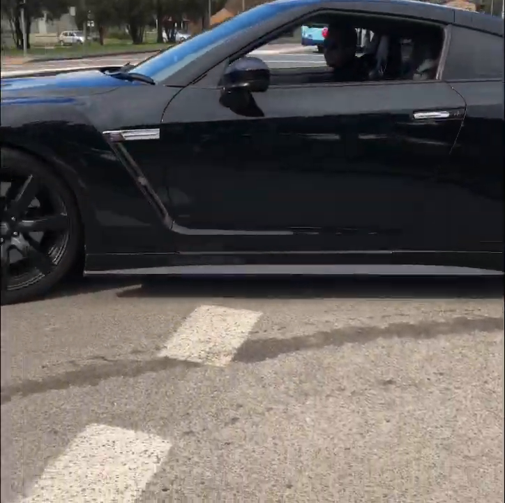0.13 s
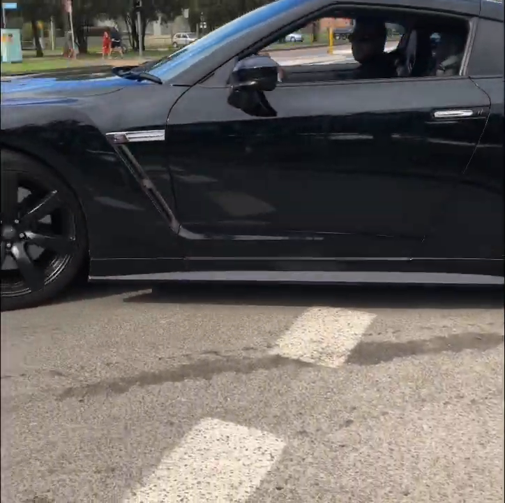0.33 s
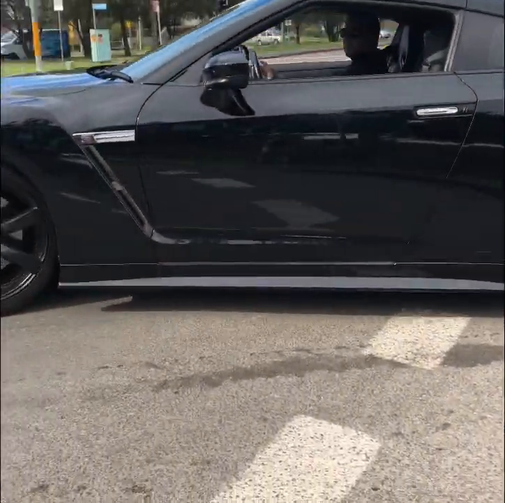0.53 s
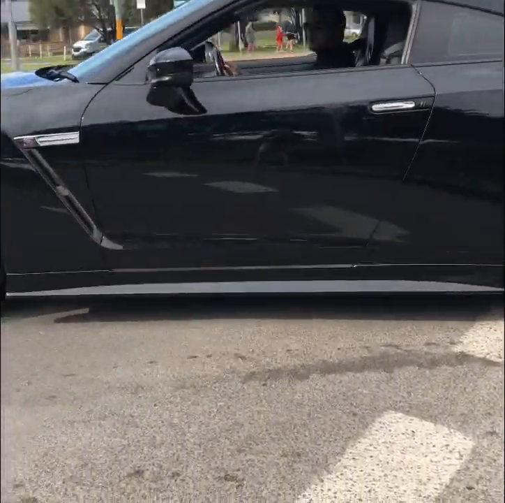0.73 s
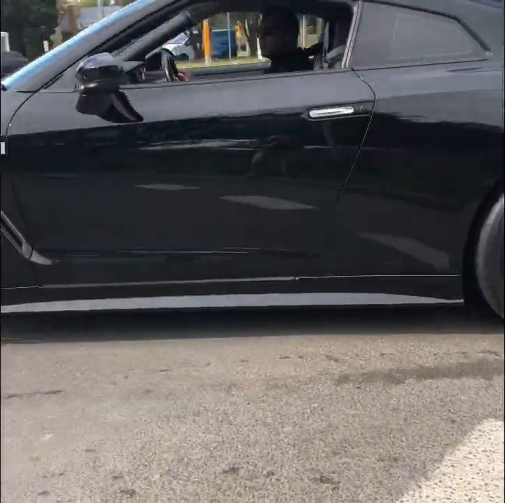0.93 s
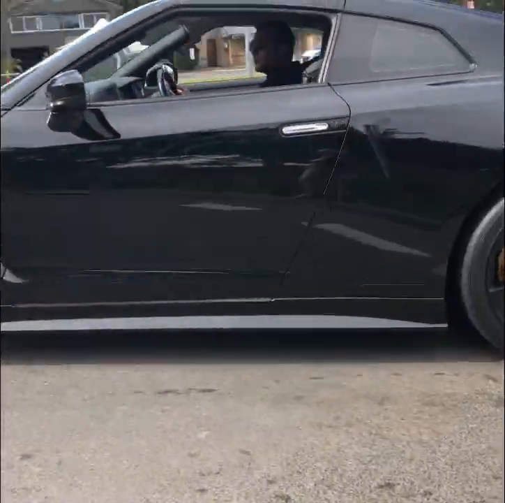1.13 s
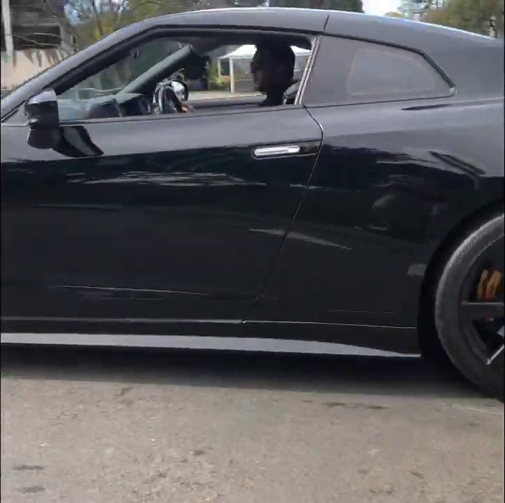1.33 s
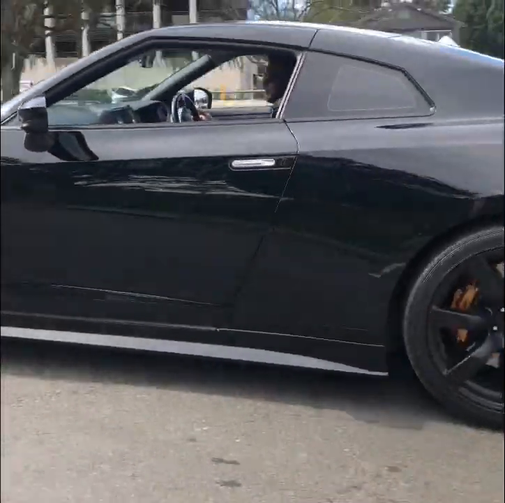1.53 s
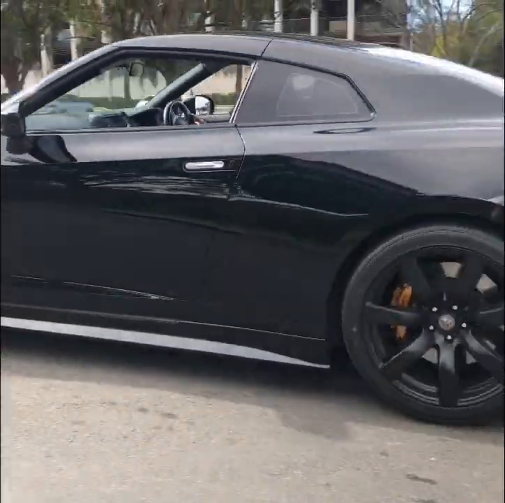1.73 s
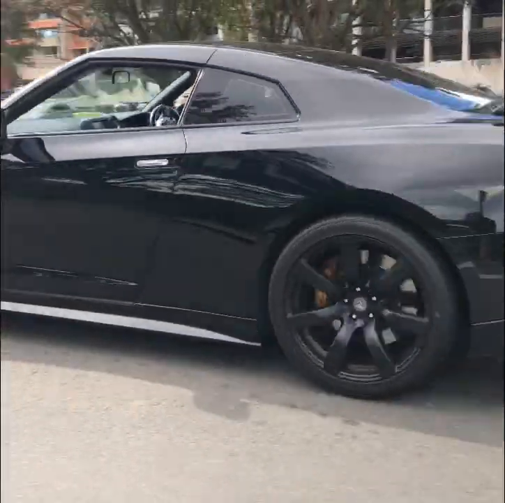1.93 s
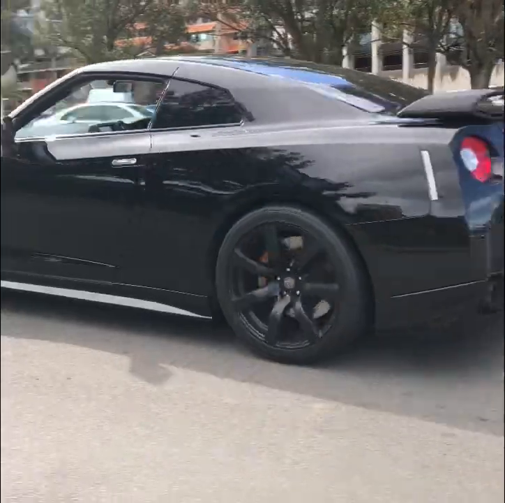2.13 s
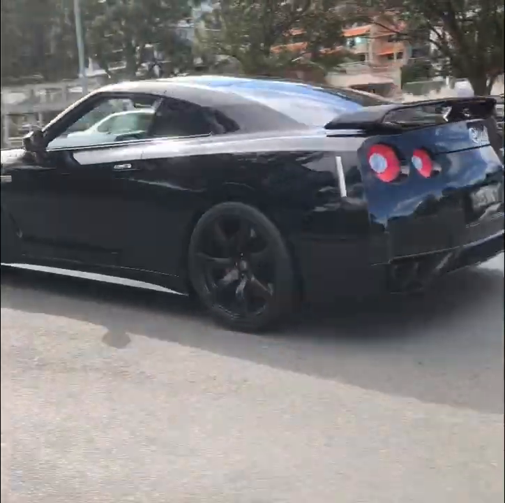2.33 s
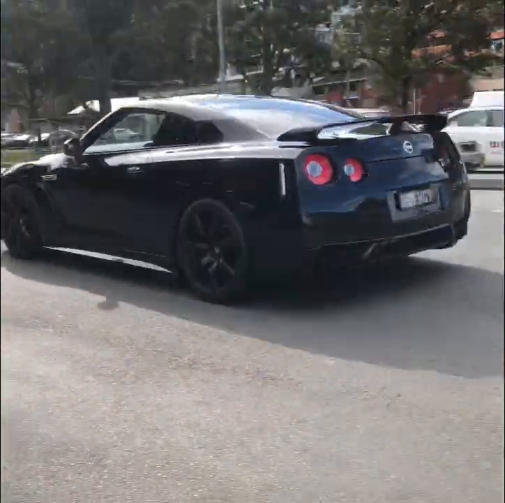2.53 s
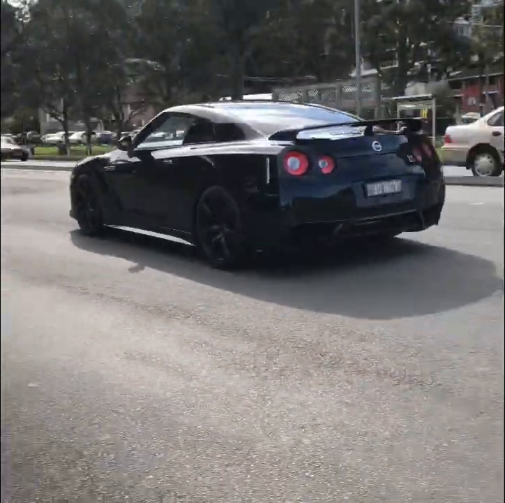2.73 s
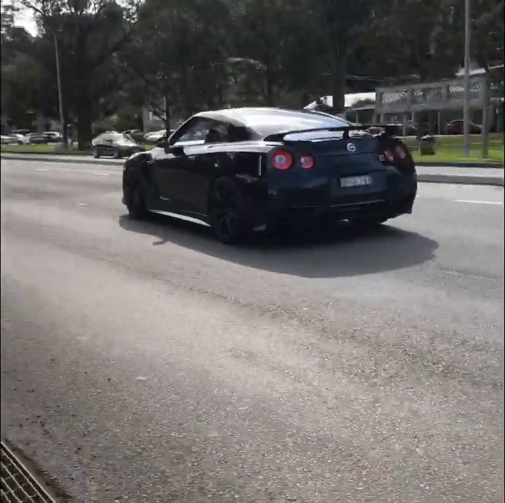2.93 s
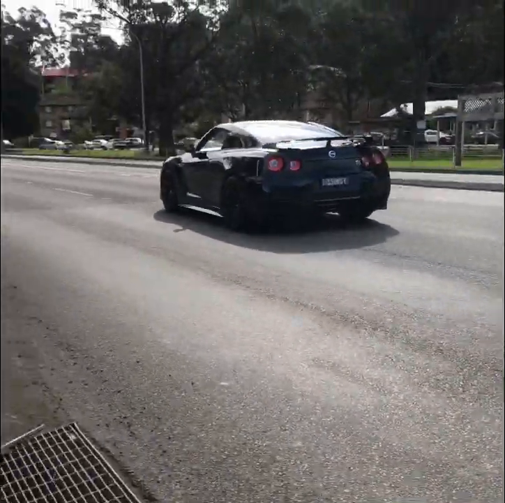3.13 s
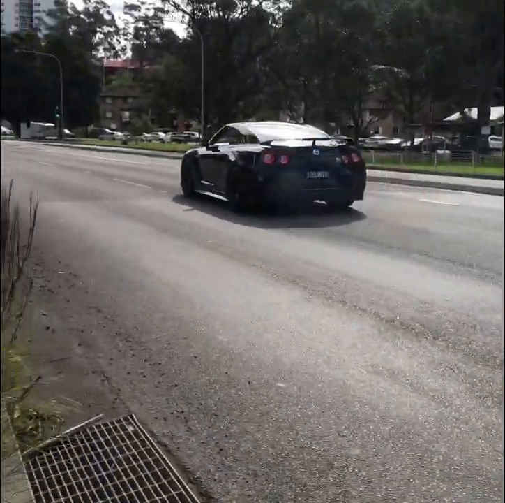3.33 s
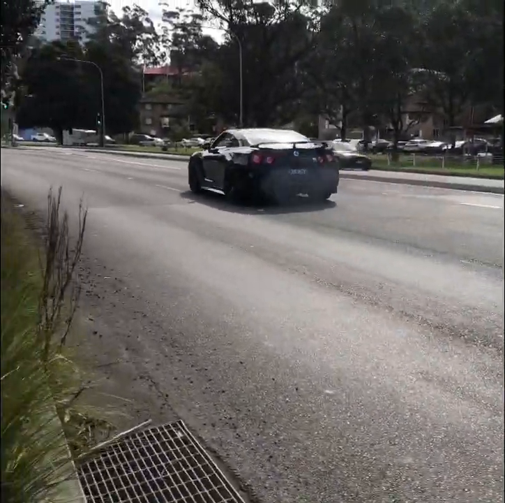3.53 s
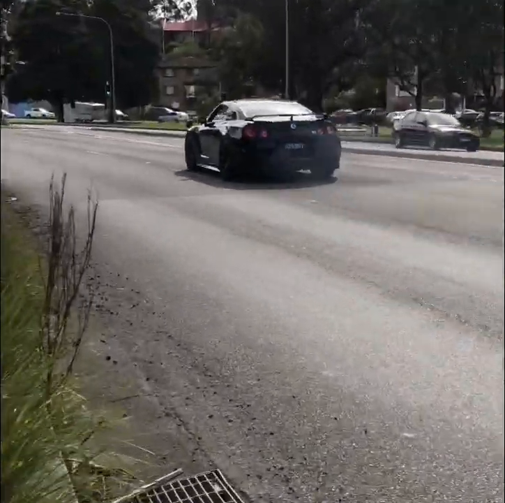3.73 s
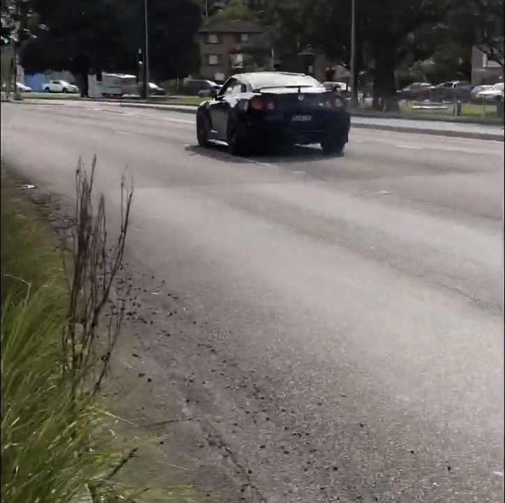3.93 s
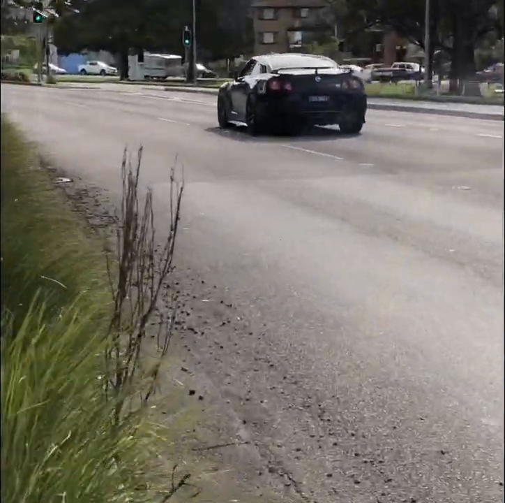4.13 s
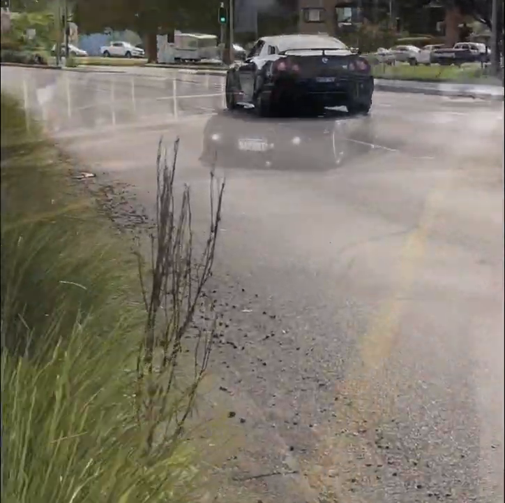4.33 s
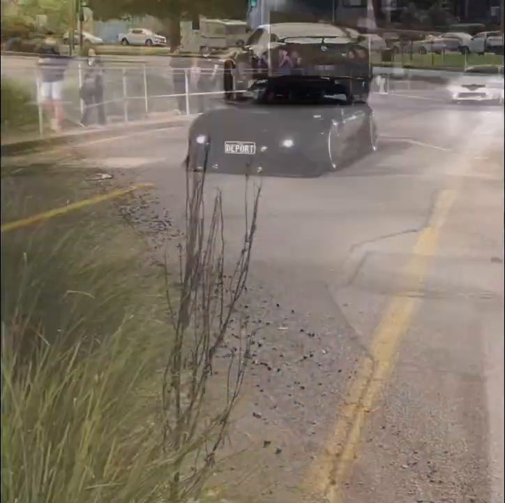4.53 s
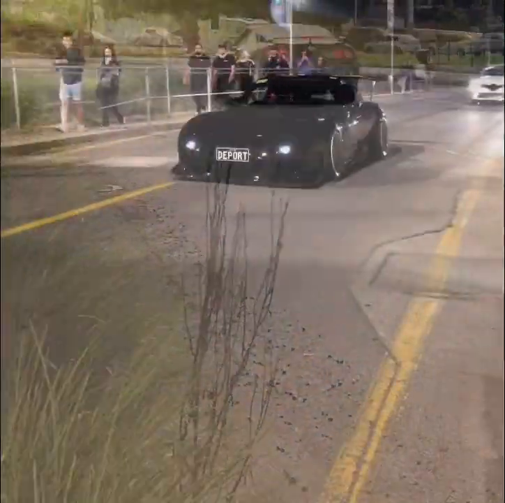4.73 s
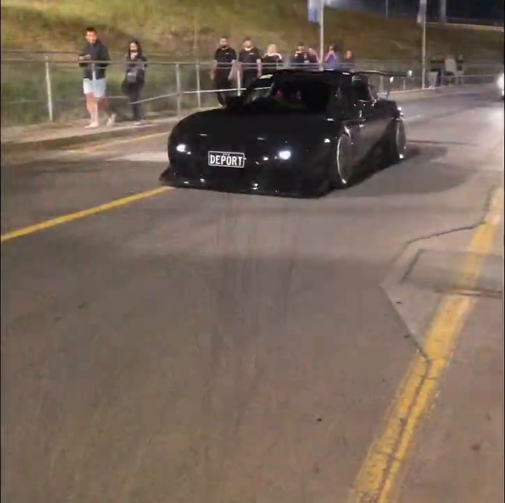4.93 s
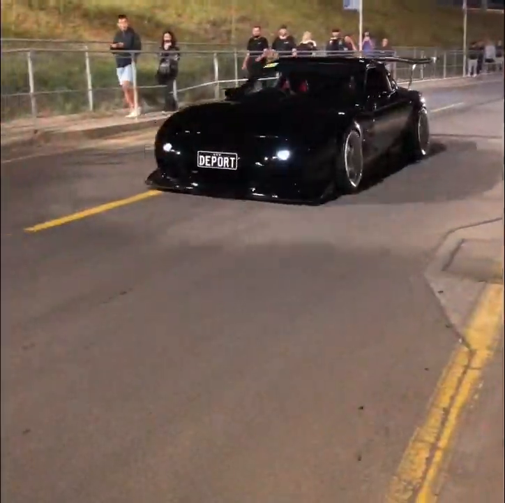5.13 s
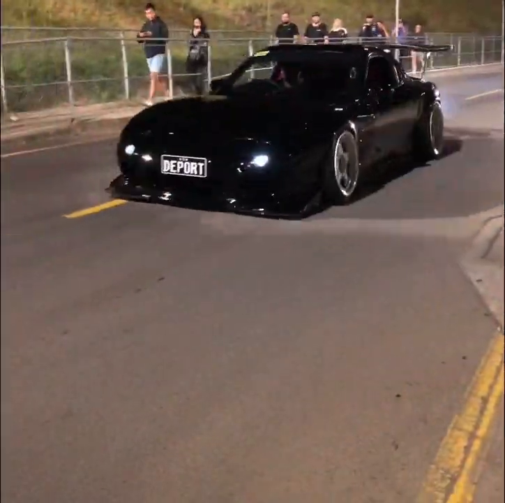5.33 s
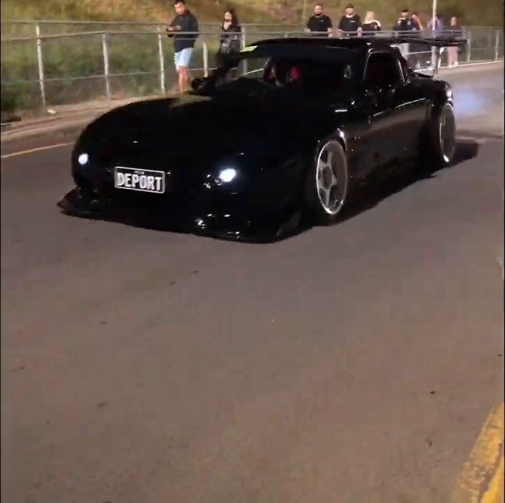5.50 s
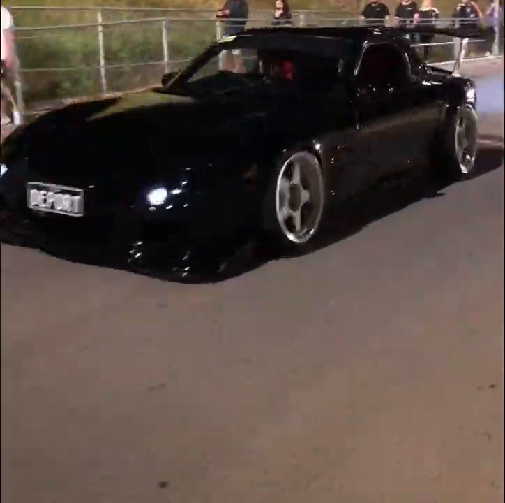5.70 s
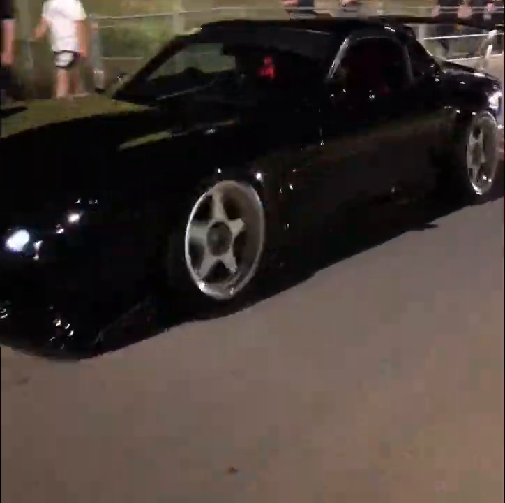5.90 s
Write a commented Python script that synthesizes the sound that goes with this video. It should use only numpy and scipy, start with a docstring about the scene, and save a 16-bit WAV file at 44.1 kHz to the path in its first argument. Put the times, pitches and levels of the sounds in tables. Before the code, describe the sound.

Outdoors beside a road, distant traffic rumbles low throughout. A six-cylinder sports car creeps off close by with a deep, throbbing exhaust. A thin turbo whistle rises during the first 0.7 seconds, and grit cracks sharply under the tyres until about 1.5 seconds. The revs climb steadily, turning to a growl and then a snarl around 2.5 seconds. From 3 seconds the pitch shoots up with a raspy roar and hiss as the car pulls away, peaking near 3.6 seconds. The throttle lifts with a pop at 3.7 seconds, the engine falls and fades, and a few softer pops follow between 4.3 and 4.6 seconds. From about 4.3 seconds a second car fades in, its exhaust buzzing lumpily at low, wavering revs. Faint short squeaks come between 5 and 5.5 seconds. It grows louder and is close by at the end, around 6 seconds.

```python
"""An open-air roadside, with distant traffic. A six-cylinder sports car creeps over cracking grit, turbo
whistling, revs hard as it pulls away, lifts off and pops. Its unequal firings ring the exhaust pipe,
throb once a cycle and tear the gas into roar and rasp. The scene fades into a second car that rolls up
close with faint squeaks; its alternating strong and weak firings make a short pipe buzz lumpily."""
import sys
import numpy as np
from scipy import signal
from scipy.fft import rfft, irfft, next_fast_len
from scipy.io import wavfile
from scipy.ndimage import uniform_filter1d, map_coordinates

SR = 44100
rng = np.random.default_rng(int(sys.argv[2]) if len(sys.argv) > 2 else 0)


def transcribe(u):
    """Save the signal u as a 16-bit wav file named by the first command-line argument.

    u: samples, shape (n,) or (channels, n), limited to [-1, 1]; the rate is SR.
    q: integer samples, one column per channel.
    """
    v = np.clip(np.atleast_2d(u).T, -1, 1)
    q = np.round(v * 32767).astype(np.int16)
    wavfile.write(sys.argv[1], SR, q)


N = 267378
TIME_S = np.arange(N) / SR


def amp(db):
    return 10 ** (np.asarray(db) / 20)


def unit_rms(x):
    return x / np.sqrt(np.mean(x ** 2) + 1e-20)


def ramp(x, start, end):
    return np.clip((x - start) / (end - start), 0, 1)


def along(points, hz):
    """Interpolate (Hz, value) points on a log axis."""
    point_hz, values = np.transpose(points)
    return np.interp(np.log(hz + 1), np.log(point_hz + 1), values)


def curves(rows):
    """Per-sample curve of each column after time, and a soft gate over the table's span."""
    times_s, *columns = np.transpose(rows)
    inside = (TIME_S >= times_s[0]) & (TIME_S <= times_s[-1])
    return [np.interp(TIME_S, times_s, c) for c in columns], uniform_filter1d(inside * 1., size=2000)


def wobble(rate_hz):
    """Smooth random curve."""
    return map_coordinates(rng.standard_normal(int(N * rate_hz / SR) + 4), [TIME_S * rate_hz])


def filtered(x, response):
    size = next_fast_len(N + SR // 2)
    return irfft(rfft(x, size) * response(np.fft.rfftfreq(size, 1 / SR)), size)[:N]


def coloured(x, spectrum):
    return unit_rms(filtered(x, lambda hz: amp(along(spectrum, hz))))


def noise(spectrum, beat=1):
    """Noise gated by a beat, then coloured; rms 1."""
    return coloured(beat * rng.standard_normal(N), spectrum)


def ring_pipe(blows, modes):
    """Pulses through pipe resonances, high-passed at the lowest; rms 1."""
    def response(f):
        highpass = (1j * f / (modes[0][0] + 1j * f)) ** 2
        return highpass * sum((-1) ** k * amp(db) * 1j * f * width / (hz * hz - f * f + 1j * f * width)
                              for k, (hz, width, db) in enumerate(modes))
    return unit_rms(filtered(blows, response))


def pulses(turns, scatter_db):
    """One impulse of random size per whole turn."""
    at = np.flatnonzero(np.diff(np.floor(turns), prepend=np.floor(turns[0])))
    train = np.zeros(N)
    train[at] = amp(scatter_db * rng.standard_normal(4000)[:len(at)])
    return train


def orders(turns, multiples, levels_db, rough):
    """Sines on multiples of the firing rate, wavering in level and phase."""
    return sum(np.sqrt(2) * amp(db + 3.1 * rough * wobble(25))
               * np.sin(k * (2 * np.pi * turns + rough * wobble(30) / 4) + rng.uniform(0, 2 * np.pi))
               for k, db in zip(multiples, levels_db))


# Exhaust pipe response, low orders: (frequency [Hz], gain [dB])
LOW_PIPE = [(55.0, -12), (85.0, -1), (110.0, -7), (137.0, -9), (165.0, -5.5), (195.0, 1.8), (235.0, 11),
            (275.0, 5), (310.0, 2), (360.0, 5.5), (440.0, -1.8), (520.0, 5), (660.0, 9), (850.0, 7),
            (1300.0, 5.5)]
# Brief dips of single orders: (time [s], order [-], gain [dB], half-length [s])
ORDER_DIPS = [(0.86, 4, -19, 0.32), (1.4, 1, -12, 0.057), (2.0, 4, -8.5, 0.21), (2.183, 1, -29, 0.112),
              (2.895, 1, -13, 0.073), (3.116, 2, -4, 0.055), (3.208, 1, -10.5, 0.18), (3.35, 4, -6, .2)]
# Once-a-cycle throb: (firing rate [Hz], depth [0-1])
THROB_DEPTH = [(100, 0.18), (148, 0.25), (165, 0), (185, 0.12), (225, 0.6), (320, 0.56)]
# Orders 1.5, 2.5, 3.5, 4.5: (level re exhaust [dB])
HALF_ORDERS_DB = [-13.5, -10.5, -15, -15.5]


def exhaust_tones(hz, level_db, turns, cycle):
    """Unequal firings throb in the pipe; under load the two banks growl on half orders."""
    stab, far = ramp(TIME_S, 1.325, 1.365), ramp(TIME_S, 2.724, 2.81)  # throttle down; car draws off
    soft_db, hard_db, far_db = [7.5, 2.5, -3.5, -10], [8, 7.5, -5, -4.5], [2.5, -.5, 2, -5.5]
    low_db = [level_db + along(LOW_PIPE, k * hz) + soft + (hard - soft) * stab + shift * far
              for k, soft, hard, shift in zip((1, 2, 3, 4), soft_db, hard_db, far_db)]
    for at_s, order, db, half_s in ORDER_DIPS:
        low_db[round(order) - 1] += db * np.exp(-((TIME_S - at_s) / half_s) ** 2)
    depth = along(THROB_DEPTH, hz)
    swell = np.cos(2 * np.pi * (cycle - .2)) + .3 * np.cos(4 * np.pi * (cycle - .15))
    bunched = turns + .06 * depth * np.sin(2 * np.pi * (cycle - .2))  # firings crowd to the hard blow
    fundamental = (1 + .55 * depth * swell) * orders(bunched, [1], low_db, rough=.35)
    overtones = (1 + depth * swell) * orders(bunched, (2, 3, 4), low_db[1:], rough=.3)
    halves = np.arange(1, 5) + .5
    growl_db = [level_db + db + along(LOW_PIPE, k * hz) for k, db in zip(halves, HALF_ORDERS_DB)]
    growl = stab * (1 - .6 * far) * orders(turns, halves, growl_db, rough=.6)
    return fundamental + overtones + growl


# Exhaust pipe response, upper orders: (frequency [Hz], gain [dB])
UPPER_PIPE = [(250, -3), (520, 4.5), (700, -11), (1200, -23), (2500, -31.5), (3300, -64)]
# Upper-order drive: (time [s], level re exhaust [dB])
SNARL_DRIVE = [(0, -44), (.7, -15), (1.6, -15.5), (2.4, 4.5), (2.55, 16), (2.75, 4.5), (3.02, -3),
               (3.4, -4), (3.75, 16.5), (4.3, 19)]


def exhaust_snarl(hz, level_db, turns, cycle):
    """Orders 5-13 burst with each cycle's hard blow."""
    (drive_db,), _ = curves(SNARL_DRIVE)
    multiples = range(5, 14)
    upper_db = [level_db + drive_db + along(UPPER_PIPE, k * hz) for k in multiples]
    burst = .5 + .98 * np.exp(-2.5 * (cycle % 1))
    return burst * orders(turns, multiples, upper_db, rough=.3)


# Hard edge of each cylinder's blow: (weight [0-1])
CYLINDER_EDGE = [0.79, 0.54, 0.46, 0.22, 0.28, 0.25]
# Pipe resonances: (frequency [Hz], width [Hz], gain [dB])
EDGE_MODES = [(298, 70, 1), (549, 173, -2), (906, 114, -2.5), (1484, 156, -11.5), (1650, 240, -16)]
CYLINDERS = 6


def exhaust_edge(hz, level_db, cycle, lift):
    """Sharp blows ring the pipe, louder as the tailpipes swing toward the listener."""
    side_db, rear_db = -27, 2
    edge_db = level_db + side_db + (rear_db - side_db) * ramp(TIME_S, 1.53, 2.274) - 7 * lift
    firing = CYLINDERS * cycle
    blows = pulses(firing, scatter_db=1.2) * np.take(CYLINDER_EDGE, firing.astype(int) % CYLINDERS)
    return amp(edge_db) * ring_pipe(blows / np.sqrt(hz), EDGE_MODES)  # even power at any rate


# Tailpipe rasp: (frequency [Hz], density [dB])
RASP_SPECTRUM = [(1000, -17), (1800, -2), (2300, -6), (3200, 8), (8000, -13.5), (16000, -27)]


def tailpipe_rasp(hz, cycle, ease, lift):
    """The hard blow tears the gas at the tailpipe, most while the revs climb fast."""
    lag_s = .12
    climb_hz_per_s = (hz - np.roll(hz, round(lag_s * SR))) / lag_s
    rasp_db = -50.5 + 25.5 * ramp(climb_hz_per_s, 114, 266) - 1.5 * ease - 7 * lift
    puff = np.exp(-22 * (cycle % 1))
    snap = coloured(pulses(cycle, scatter_db=2.5) / np.sqrt(hz), RASP_SPECTRUM)
    return amp(rasp_db) * (.85 * noise(RASP_SPECTRUM, .16 + puff) + .5 * snap)


# Gas roar: (frequency [Hz], density [dB])
ROAR_SPECTRUM = [(60, -30), (150, -4), (300, 0), (600, -5), (1200, -16), (3000, -36), (5000, -70)]


def gas_roar(hz, cycle, ease, lift):
    """Exhaust gas surges once a cycle and grows 6 dB per octave of revs."""
    roar_db = -28 + 6 * np.log2(hz / 100) - 6.5 * ease - 5 * lift
    return amp(roar_db) * noise(ROAR_SPECTRUM, 1.8 + np.exp(-3 * (cycle % 1)))


# Tyre and intake hiss: (time [s], level [dB])
HISS_LEVEL = [(0, -48), (.7, -34.5), (1.4, -36.5), (2.3, -44), (2.63, -35), (3.02, -40.5), (3.4, -28),
              (3.7, -39), (3.95, -57), (4.5, -55)]
# Its colour: (frequency [Hz], density [dB])
HISS_SPECTRUM = [(800, -11), (1500, -2.5), (3500, -6), (5000, -13), (7100, -13.5), (16000, -21.5)]


def tyre_and_intake_hiss():
    """Flickering treble noise."""
    (hiss_db,), _ = curves(HISS_LEVEL)
    return amp(hiss_db + 2.07 * wobble(17)) * noise(HISS_SPECTRUM)


# Six-cylinder engine: (time [s], firing rate [Hz], exhaust level [dB])
SPORTS_REVS = [(0, 56.8, -30), (.2, 55.36, -21.5), (.41, 59.24, -16), (.73, 76.87, -18.5),
               (1.07, 84.74, -18.5), (1.34, 94.46, -16), (1.68, 101, -20), (1.93, 115.9, -23),
               (2.19, 136.2, -25), (2.43, 148.8, -28.5), (2.6, 163.8, -23), (2.87, 179.5, -25.5),
               (3.07, 208, -31.5), (3.19, 229.8, -28.5), (3.29, 257, -23.5), (3.39, 289.6, -23.5),
               (3.5, 315.7, -26.5), (3.6, 320.8, -33.5), (3.74, 312.4, -33), (3.82, 238, -44.5),
               (4.0, 178.6, -49), (4.3, 161.7, -51)]


def sports_car():
    """Six firings a cycle, one hardest, drive every exhaust layer."""
    (hz, level_db), running = curves(SPORTS_REVS)
    _, noise_gate = curves(HISS_LEVEL)
    ease, lift = ramp(TIME_S, 3.44, 3.527), ramp(TIME_S, 3.76, 4.12)  # throttle eased, then released
    turns = np.cumsum(hz) / SR
    cycle = turns / CYLINDERS + .7  # hard blow at each whole number
    tones = exhaust_tones(hz, level_db, turns, cycle) + exhaust_snarl(hz, level_db, turns, cycle)
    edge = exhaust_edge(hz, level_db, cycle, lift)
    gas = tailpipe_rasp(hz, cycle, ease, lift) + gas_roar(hz, cycle, ease, lift)
    return running * (tones + edge) + noise_gate * (gas + tyre_and_intake_hiss())


# Turbo whistle: (time [s], pitch [Hz], level [dB])
TURBO_WHISTLE = [(0, 3060, -50), (.25, 3052, -47.5), (.45, 3430, -45.5), (.62, 3810, -40), (.72, 3990, -59)]


def turbo():
    """A thin, breathy whistle climbs as the revs first rise."""
    (hz, db), gate = curves(TURBO_WHISTLE)
    level = gate * np.sqrt(2) * amp(db + 2.5 * wobble(40))
    return level * np.sin(2 * np.pi * np.cumsum(hz + 25 * wobble(150)) / SR)


# Traffic rumble: (time [s], level [dB])
TRAFFIC_LEVEL = [(0, -36), (2.2, -28.5), (2.7, -44), (4.2, -36.5), (6.06, -22.5)]


def traffic():
    """Distant traffic, a lumpy low rumble."""
    (db,), _ = curves(TRAFFIC_LEVEL)
    return amp(db + 2.24 * wobble(6)) * noise([(20, -42), (45, 4), (120, 16.5), (300, -32)])


# Stones under the tyres, plus the low crack of the lift-off pop at 3.74 s: (time [s], level [dB], crunch offset
# [dB])
STONES = [(0.0743, -35, 9), (0.102, -35.5, 3), (0.3506, -37, 4), (0.46, -25.5, -5), (0.4904, -30.5, 10),
          (0.622, -18.5, -2), (0.635, -37, -6), (0.725, -27, -13), (0.73, -24, 6.5), (0.7485, -29, 10.5),
          (0.876, -23, 3.5), (0.9904, -28.5, 9), (1.1432, -23.5, 5), (1.1615, -27, -7), (1.3032, -24, -3),
          (1.3265, -25.5, -17), (1.3758, -27.5, -16), (1.4165, -25, 0), (1.4559, -24, 2),
          (3.74, -31.5, -14), (3.918, -40.5, -7)]


def grit():
    """Each stone cracks in a short ragged burst; tiny specks fall in between."""
    crack_level, crunch_level = np.zeros((2, N + SR))
    age_s, t60_s = np.arange(SR // 5) / SR, .06
    for at_s, db, crunch_db in STONES:
        ragged_db = 3.4 * rng.standard_normal(len(age_s) // 64 + 1).repeat(64)[:len(age_s)]
        burst = amp(db - 60 * age_s / t60_s + ragged_db) * (1 - np.exp(-age_s / .002))
        crack_level[round(at_s * SR):][:len(burst)] += burst
        crunch_level[round(at_s * SR):][:len(burst)] += amp(crunch_db) * burst
    crack = noise([(1500, -30), (3500, -4), (7500, 0), (16000, -4)])
    crunch = noise([(600, -30), (1200, 0), (2500, -4), (5000, -20), (8000, -50)])
    (hiss_db,), gate = curves(HISS_LEVEL)
    ticks = (rng.random(N) < 150 / SR) * amp(4 * np.minimum(rng.exponential(size=N), 3))
    specks = signal.lfilter([1], [1, -.97], ticks) * amp(hiss_db - 22) * gate
    return (amp(-1) * crack_level[:N] + specks) * crack + amp(-3) * crunch_level[:N] * crunch


# Exhaust pops: (time [s], level [dB], hold [s])
POP_EVENTS = [(3.735, -22.5, 0.0249), (4.298, -31, 0.056), (4.466, -48, .02), (4.513, -38, 0.043),
              (4.57, -30, 0.039)]
# Their colour: (frequency [Hz], density [dB])
POP_SPECTRUM = [(150, -18), (500, -6.5), (1000, -10.5), (2500, -23.5), (6000, -47), (16000, -66)]


def exhaust_pops():
    """Unburnt gas pops: sharp start, short hold, quick release."""
    release_db_per_s = 900
    envelope = sum(amp(db - release_db_per_s * np.maximum(TIME_S - at_s - hold_s, 0))
                   * ramp(TIME_S, at_s, at_s + .0022) for at_s, db, hold_s in POP_EVENTS)
    return envelope * amp(1.07 * wobble(90)) * noise(POP_SPECTRUM)


# Short pipe resonances: (frequency [Hz], width [Hz], gain [dB])
BUZZ_MODES = [(274, 185, 4.5), (393.7, 37.5, 10.5), (529, 58, -5.5), (808, 188, 1.5), (967, 107, 2),
              (1240, 314, -8.5), (1850, 1270, -23.5), (2640, 170, -25)]
# Reflections off road, fence and bank: (delay [s], gain [dB])
REFLECTIONS = [(.0043, -3.5), (.0078, 2.5), (0.017, 4.5)]


def pipe_buzz(turns):
    """Two chambers, one stronger, fire in turn into a short pipe; the blows echo."""
    blows = pulses(turns, scatter_db=1) * (1 + .3 * np.sign(turns % 2 - 1))
    echoes = sum(amp(db + 2.5 * wobble(15)) * np.roll(blows, round(delay_s * SR))
                 for delay_s, db in REFLECTIONS)
    return ring_pipe(blows + echoes, BUZZ_MODES)


# Second engine: (time [s], firing rate [Hz], exhaust level [dB])
LUMPY_REVS = [(4.25, 82.07, -35.5), (4.45, 84.96, -41.5), (4.5, 85.9, -32), (4.64, 80.13, -29),
              (4.98, 89.27, -25), (5.06, 89.4, -20.5), (5.21, 89.72, -23.5), (5.36, 72.97, -20),
              (5.6, 86.66, -21), (5.75, 81.9, -21), (5.98, 91.2, -20), (6.06, 87.9, -16.5)]
# Orders 1, 2, 3, 4, 5, 7: (level re exhaust [dB])
LUMPY_ORDERS_DB = [0.1, 6, -2.5, -10.5, -5.5, 5]
# Silencer response: (frequency [Hz], gain [dB])
SILENCER_GAIN = [(70.0, -0.5), (95.0, 9.5), (140.0, -3.5), (190.0, 0.9), (220.0, 4.5), (270.0, -3),
                 (300.0, 7.5), (370.0, 3.5), (520.0, -16.3), (640.0, -3.5)]
# Low gas noise: (frequency [Hz], density [dB])
GRUMBLE_SPECTRUM = [(25, -42), (75, -36), (170, 0), (900, -8.5), (5000, -41), (9000, -100)]
# High gas noise: (frequency [Hz], density [dB])
FIZZ_SPECTRUM = [(1200, -62), (2600, -2.5), (3700, -1.5), (7000, -10.5), (11400, -4), (16000, -14)]


def lumpy_car():
    """Silencer tones, pipe buzz and puffs of gas noise grow as the car rolls up."""
    (hz, level_db), running = curves(LUMPY_REVS)
    turns = np.cumsum(hz) / SR
    multiples = (1, 2, 3, 4, 5, 7)
    low_db = [level_db + db + along(SILENCER_GAIN, k * hz) for k, db in zip(multiples, LUMPY_ORDERS_DB)]
    tones = orders(turns, multiples, low_db, rough=.3)
    pulse_db = level_db + .35 * (hz - 85)
    jittered = turns + .009 * wobble(60)
    buzz = amp(pulse_db + 3) * pipe_buzz(jittered)
    puff = np.exp(-4 * (jittered % 1))
    grumble = amp(pulse_db - 1) * noise(GRUMBLE_SPECTRUM, 1.2 + puff)
    fizz_db = -36 + .94 * (pulse_db - pulse_db[-1]) + 1.8 * wobble(5.2)
    fizz = amp(fizz_db) * noise(FIZZ_SPECTRUM, 1.7 + puff)
    return running * (tones + buzz + grumble + fizz)


# Squeaks: (time [s], pitch [Hz], level [dB], half-length [s])
SQUEAK_EVENTS = [(5.03, 1850, -38, .03), (5.08, 2780, -41, .04), (5.326, 3650, -43, .03),
                 (5.43, 3730, -45, 0.061)]


def squeaks():
    """Short, unsteady whistles as the second car rolls up."""
    return sum(np.sqrt(2) * amp(db + 3.5 * wobble(60)) * np.exp(-((TIME_S - at_s) / half_s) ** 2)
               * np.sin(2 * np.pi * hz * TIME_S + 1.2 * wobble(130))
               for at_s, hz, db, half_s in SQUEAK_EVENTS)


def scene():
    return (sports_car() + turbo() + traffic() + grit() + exhaust_pops() + lumpy_car() + squeaks())[None]


def record(dry):
    """The phone microphone rounds off the highest peaks and limits the band."""
    ceiling, top_hz = .95, 15830
    rounded = dry[0] / (1 + np.abs(dry[0] / ceiling) ** 6) ** (1 / 6)
    return filtered(rounded, lambda hz: hz < top_hz)[None]


dry = scene()
out = record(dry)
transcribe(out)
```